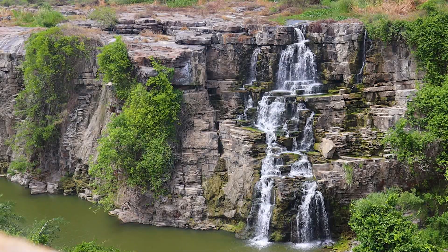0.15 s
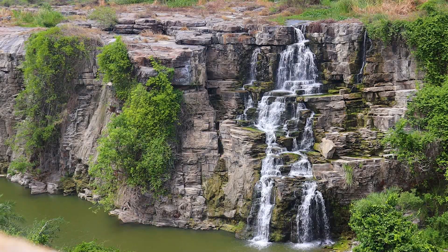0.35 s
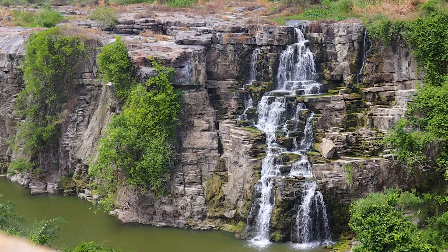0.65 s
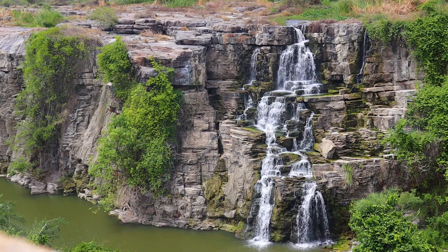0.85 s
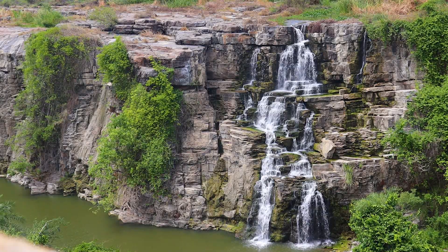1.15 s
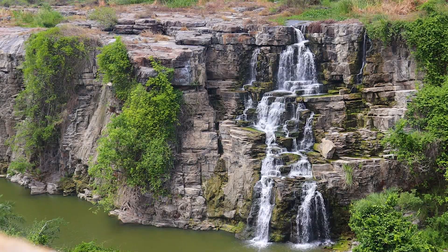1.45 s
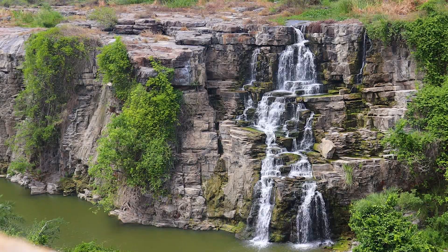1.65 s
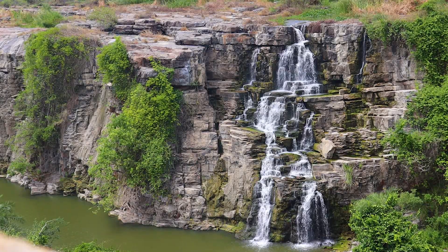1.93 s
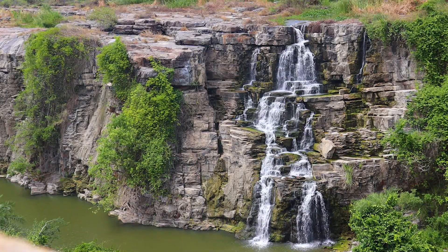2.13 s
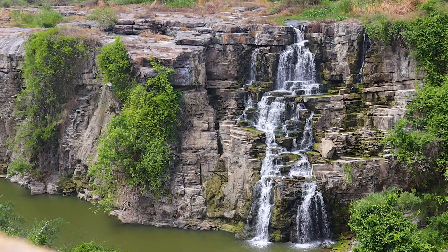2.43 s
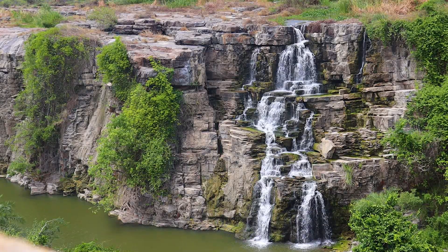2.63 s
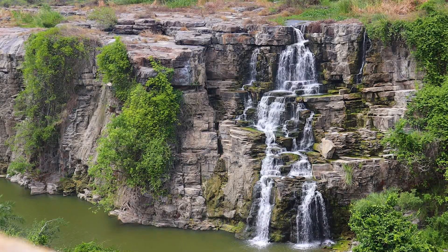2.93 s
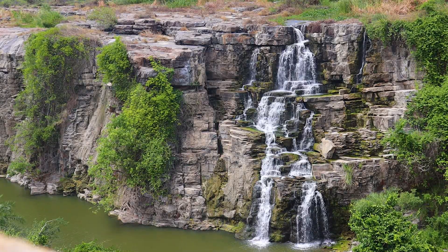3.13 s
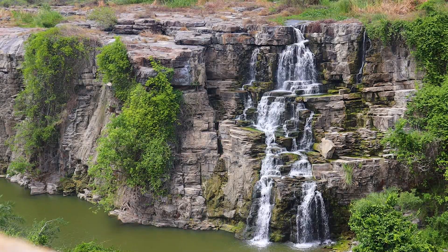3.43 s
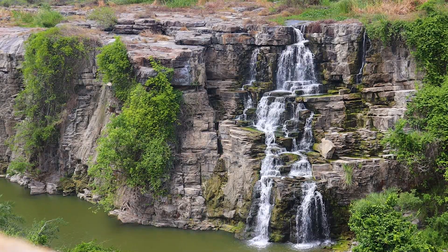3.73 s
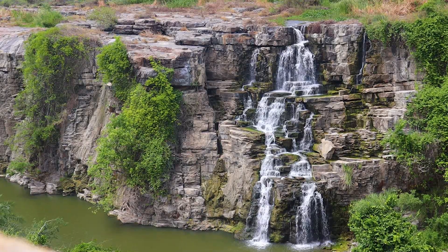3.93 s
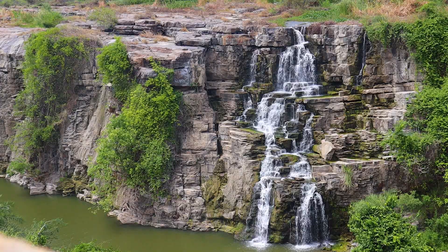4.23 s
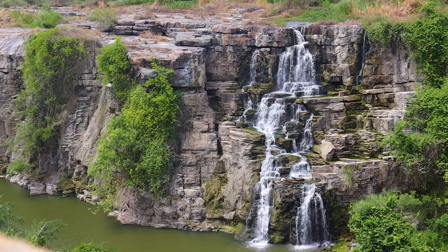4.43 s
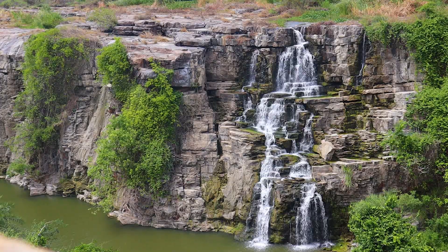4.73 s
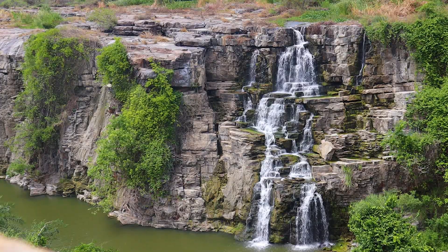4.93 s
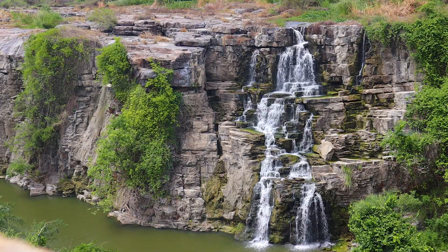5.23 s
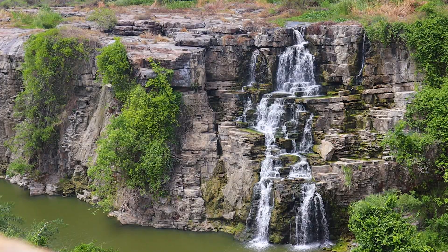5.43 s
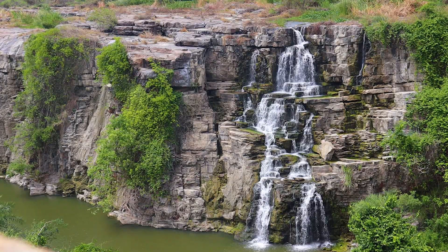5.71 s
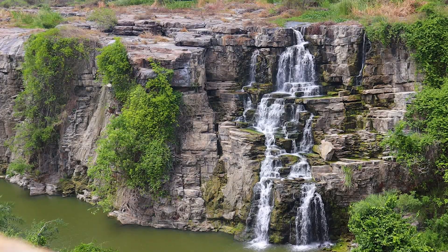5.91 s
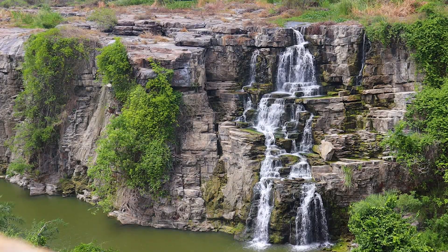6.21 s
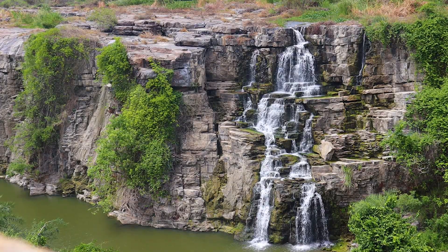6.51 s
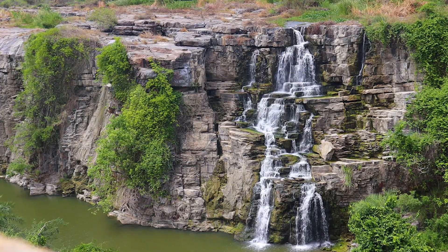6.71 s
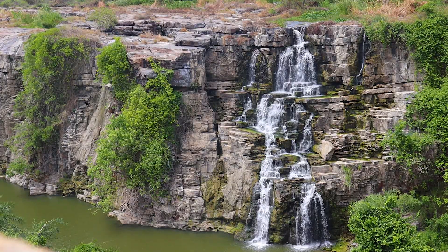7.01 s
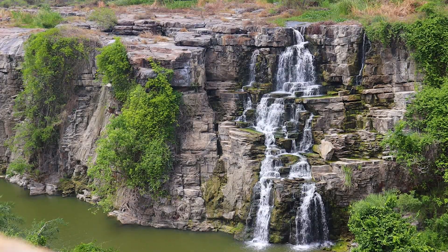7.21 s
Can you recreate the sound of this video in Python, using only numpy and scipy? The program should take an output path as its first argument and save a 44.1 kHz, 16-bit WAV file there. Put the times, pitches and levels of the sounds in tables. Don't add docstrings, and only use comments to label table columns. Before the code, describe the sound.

Steady falling water, low and hissy, dwindles to almost nothing over four seconds, leaving a faint woodland hush. One bird nearby sings a brisk song near the centre, another replies just left with repeated falling chirps. Small far calls and brief leaf rustles follow, then late quiet rising notes on the left as the water begins to swell. Open air, stereo, birds well above the water.

```python
import sys
import numpy as np
from scipy import signal
from scipy.io import wavfile
from scipy.ndimage import uniform_filter1d

SR = 44100
rng = np.random.default_rng(int(sys.argv[2]) if len(sys.argv) > 2 else 0)


def invert_db(level):
    return 10 ** (np.asarray(level, dtype=float) / 20)


def file_out(sig):
    cols = np.atleast_2d(sig).T
    lim = np.clip(cols, -1, 1)
    pcm = np.round(lim * 32767).astype(np.int16)
    wavfile.write(sys.argv[1], SR, pcm)


N = 324576


def evened(x):
    return x / np.sqrt(np.mean(x ** 2) + 1e-20)


def band_evened(x, lo_hz, hi_hz):
    hz, power = signal.welch(x.mean(0), SR, nperseg=4096)
    band = (hz > lo_hz) & (hz < hi_hz)
    return x / np.sqrt(power[band].sum() * hz[1])


def read(points, hz):
    f, value = np.transpose(points)
    return np.interp(np.log(hz + 1), np.log(f + 1), value)


def add(mix, s, sound):
    part = mix[..., round(s * SR):][..., :sound.shape[-1]]
    part += sound[..., :part.shape[-1]]


def hiss(colour, side_db, patchy_db, flicker_db):
    frames, hz = N // 256 + 5, np.fft.rfftfreq(1024, 1 / SR)
    a, b, c, d, patches = rng.standard_normal((frames, 513, 5)).T
    patches = uniform_filter1d(patches, size=12, axis=0)
    patches = evened(uniform_filter1d(patches, size=10, axis=1))
    gushes = evened(uniform_filter1d(rng.standard_normal(frames), size=6))
    mid = a + 1j * b
    side = (c + 1j * d) * invert_db(np.minimum(read(side_db, hz), 0))[:, None]
    z = np.array([mid + side, mid - side])
    z *= invert_db(read(colour, hz)[:, None] + patchy_db * patches + flicker_db * gushes)
    return signal.istft(z, nperseg=1024, noverlap=768)[1][:, :N]


# (f/Hz, level/dB per Hz)
RUSH = [(15, -52), (25, -23.5), (102, -4.5), (279, -3), (469, -4), (543, -2), (1220, -5), (1690, -9.5),
        (3280, -14.5), (3620, -17.5), (3990, -18.5), (4300, -20), (9000, -32.5), (11700, -61),
        (19800, -120)]
# (f/Hz, side minus mid level/dB)
RUSH_SIDE = [(60, -30), (110, -46), (200, -65), (380, -17), (700, -18.5), (1290, -12), (2380, -5),
             (4400, 1), (8120, 8), (15000, 0)]
# (f/Hz, level/dB per Hz)
SPRAY = [(5000, -18), (7000, -0.5), (9500, -1.5), (12000, 1.5), (14000, -1), (16000, -7)]


def water():
    fade_out_s, fade_in_s, span_s = 4.32, 5.6, 4.3
    rush_db, spray_db, air_db = -48.5, -58, -76.5
    t = np.arange(N) / SR
    water_fade = np.maximum(np.maximum(fade_out_s - t, t - fade_in_s), 0) / span_s
    rush = band_evened(hiss(RUSH, RUSH_SIDE, patchy_db=1.15, flicker_db=0.47), 50, 150)
    spray = band_evened(hiss(SPRAY, [(1, 0)], patchy_db=0.6, flicker_db=1.65), 9520, 11630)
    bend = np.where(t < fade_in_s, 1.04, 0.96)
    mist = np.hypot(invert_db(spray_db) * np.tanh((1.92 * water_fade) ** 1.38), invert_db(air_db))
    return rush * invert_db(rush_db) * water_fade ** bend + spray * mist


# (f/Hz, level/dB per Hz)
WOOD = [(100, -51), (150, -30), (200, -19), (310, -1.5), (530, 0.5), (1600, -9), (2200, -5), (3200, -4),
        (5200, -11), (9000, -24.5), (16000, -52)]
# (t/s, level/dB)
WOOD_LEVEL = [
    (0, -65),
    (1.0, -58),
    (2.6, -51.5),
    (3.8, -51.5),
    (4.2, -54.5),
    (5.6, -53),
    (6.3, -59),
    (7.36, -55),
]


def woodland():
    wood = evened(hiss(WOOD, [(1, -3)], patchy_db=1.3, flicker_db=.3))
    return wood * invert_db(np.interp(np.arange(N) / SR, *np.transpose(WOOD_LEVEL)))


def whistle(hz, level_db, fade, overtone_db):
    turn = 2 * np.pi * np.cumsum(hz) / SR
    beak_db = overtone_db - 12 * ((3 * hz - 12900) / 1500) ** 2
    tone = np.sin(turn) + invert_db(beak_db) * np.sin(3 * turn)
    return np.sqrt(2) * invert_db(level_db) * tone * signal.windows.tukey(len(hz), fade)


def warble(t, hz, db, depth, fade, overtone_db):
    warble_hz = 193.7
    wander = evened(uniform_filter1d(rng.standard_normal(len(t)), size=400))
    shake = 2 * np.pi * warble_hz * t + 0.71 * wander
    return whistle(hz + depth * np.sin(shake), db, fade, overtone_db)


# (f/Hz, t/s)
TREES = [(1000, 0.11), (2500, 0.95), (4500, 0.53), (7000, 0.9), (12000, 0.052)]


def trees(x, wet_db, near_db, near_s, same):
    taps = np.zeros((2, SR))
    at = np.arange(0, SR - 20, 20) + rng.integers(0, 20, (2, SR // 20 - 1))
    np.put_along_axis(taps, at, rng.choice([-1., 1.], at.shape), axis=1)
    taps[1] = same * taps[0] + np.sqrt(1 - same ** 2) * taps[1]
    lag = np.arange(SR) / SR
    near = 1 + invert_db(near_db) * np.exp(-lag / near_s)
    taps *= np.minimum(lag / 0.0018, 1) * near
    hz, t, z = signal.stft(taps, SR, nperseg=256)
    tail = signal.istft(z * invert_db(-60 * t / read(TREES, hz)[:, None]), SR, nperseg=256)[1]
    echo = signal.fftconvolve(x, tail / np.linalg.norm(tail[0]), axes=1)[:, :N]
    return x + invert_db(wet_db) * echo


# (t/s, length t/s, start f/Hz, end f/Hz, level/dB)
PIPER = [
    (0.024, 0.074, 3934, 3872, -33),
    (0.515, 0.087, 3972, 3903, -34.5),
    (1.042, 0.11, 3889, 3840, -36.5),
]
SEEPS = [
    (1.28, 0.041, 9650, 8860, -46.5),
    (1.612, .03, 9450, 9100, -52),
    (2.022, .028, 9500, 8330, -44.5),
    (4.714, 0.088, 8000, 7260, -58),
    (4.74, 0.068, 7260, 7320, -54),
    (4.881, 0.036, 7030, 6750, -62),
    (4.924, 0.047, 6740, 6660, -55),
]
CHIPS = [(3.517, 0.017, 4270, 3960, -53), (5.030, 0.012, 4420, 4020, -45),
         (5.047, 0.029, 4480, 4280, -46.5), (5.081, 0.014, 4320, 3900, -44),
         (5.295, 0.033, 5480, 5480, -63.5), (5.366, 0.012, 5170, 4460, -51),
         (5.406, 0.013, 4750, 3450, -43.5), (5.445, 0.0058, 4700, 4200, -50),
         (5.49, 0.0078, 4300, 3400, -38), (5.531, 0.012, 3330, 3100, -48), (5.559, 0.0123, 3430, 4330, -43),
         (5.603, 0.0105, 4570, 3640, -39.5), (5.650, 0.014, 5600, 4000, -57),
         (5.698, 0.0072, 3900, 4500, -43), (5.745, 0.0069, 4200, 3730, -44)]
COOS = [
    (5.182, 0.049, 2320, 2240, -59.5),
    (5.339, 0.025, 2310, 2275, -61),
    (5.434, 0.04, 1794, 1800, -55),
    (5.530, 0.157, 1850, 1790, -69),
    (5.739, 0.032, 2580, 2490, -57),
    (6.23, 0.11, 2390, 2297, -61),
]
BLIPS = [
    (2.152, 0.018, 1426, 1220, -35.5),
    (2.520, 0.019, 960, 894, -37.5),
    (5.296, 0.13, 1093, 1058, -65),
]
PIPS = [
    (6.285, .02, 4630, 4610, -71),
    (6.417, 0.018, 4550, 4640, -62),
    (6.553, 0.027, 4380, 4680, -60),
]
# (table of notes, left minus right level/dB)
PERCHES = [
    (PIPER, -4.5),
    (SEEPS, -7.5),
    (CHIPS, -5.5),
    (COOS, -7),
    (BLIPS, 2.5),
    (PIPS, 16),
]
# (t/s, length t/s, start f/Hz, end f/Hz, level/dB)
RASPS = [(0.093, 0.088, 3380, 2620, -46), (0.226, .035, 5210, 4580, -40.5), (0.257, 0.052, 4634, 4430, -37),
         (0.391, 0.077, 3100, 3410, -45.5), (0.745, 0.12, 4646, 4280, -40.5),
         (4.378, .04, 4900, 4780, -42.5), (4.514, 0.053, 7160, 7460, -63.5),
         (4.551, 0.077, 6300, 6330, -52.5), (5.097, 0.083, 3464, 3176, -44),
         (5.191, 0.083, 3120, 2695, -55), (5.453, .05, 3026, 3795, -44.5), (5.503, 0.059, 3480, 2966, -53),
         (5.756, 0.037, 2975, 3260, -48.5), (5.804, .06, 3000, 3380, -50.5),
         (5.867, 0.057, 2900, 2580, -59)]


def far_birds():
    overtone_db = -58
    out = np.zeros((2, N))
    for bird, pan_db in PERCHES:
        for s, length, start_hz, end_hz, db in bird:
            u = np.linspace(0, 1, round(length * SR))
            hz = start_hz + (end_hz - start_hz) * u ** 0.673
            add(out, s, whistle(hz, db, 0.47, overtone_db) * invert_db([[pan_db / 2], [-pan_db / 2]]))
    for s, length, start_hz, end_hz, db in RASPS:
        t = np.arange(round(length * SR)) / SR
        hz = start_hz + (end_hz - start_hz) * t / length
        rasp = warble(t, hz, db, 210, 0.5, overtone_db)
        add(out, s, rasp * invert_db([[-1.6], [1.6]]))
    return trees(out, 0.44, 2.5, 0.0077, 0.38)


def song(parts, strokes, overtone_db):
    out = np.zeros(N)
    for shape, repeats in parts:
        for start, level_db, pitch in repeats:
            for at, length, start_hz, end_hz, peak_db in shape:
                u = np.linspace(0, 1, round(length * SR))
                from_db, peak, to_db, bend = strokes[int(end_hz > start_hz)]
                swell_db = np.interp(u, [0, peak, 1], [from_db, 0, to_db])
                hz = pitch * (start_hz + (end_hz - start_hz) * u ** bend)
                add(out, start + at, whistle(hz, level_db + peak_db + swell_db, 0.18, overtone_db))
    return out


def buzz(rows, overtone_db):
    s, hz, db = np.transpose(rows)
    t = np.arange(s[0], s[-1], 1 / SR)
    hz = np.interp(t, s, hz)
    out = np.zeros(N)
    add(out, s[0], warble(t, hz, np.interp(t, s, db), 0.1 * hz, 0.12, overtone_db))
    return out


# (t/s after its start, length t/s, start f/Hz, end f/Hz, peak level/dB)
SIP = [
    (0, 0.0073, 7160, 5880, 2),
    (.008, 0.0112, 5800, 3800, -11),
    (.018, 0.024, 5730, 5260, -7),
    (.035, 0.0068, 3690, 5900, -4),
    (.041, .005, 5710, 6900, 2.5),
    (.046, .011, 7000, 8020, -13),
]
SWOOP = [
    (0, 0.00544, 7430, 4170, -8),
    (.005, .005, 4320, 5170, -9),
    (.009, 0.0187, 5260, 4910, -3.5),
    (.044, 0.027, 5600, 3078, -0.5),
    (.075, .019, 3525, 4660, 2.5),
    (.093, 0.0094, 4520, 6100, -3.5),
]
CHOP = [
    (0, 0.016, 3390, 3445, -4.5),
    (.014, 0.00595, 3750, 5340, -10),
    (.020, 0.0137, 5380, 3600, 1.5),
    (.037, 0.0074, 3440, 2950, 2),
    (.046, .017, 2900, 2050, -12),
]
TURN = [
    (0, .007, 8030, 4000, -13),
    (.034, 0.0105, 2040, 2820, -20),
    (.044, 0.0186, 2796, 3680, -0.5),
    (.065, .017, 3550, 4480, -1),
    (.083, 0.018, 3530, 1950, -9),
]
# (syllable, its repeats as (t/s, level/dB, pitch factor))
FIRST = [
    (SIP, [(1.101, -53, 1), (1.207, -35.5, 1), (1.313, -30.5, 1), (1.419, -27, 1), (1.524, -24.5, .99)]),
    (SWOOP, [(1.631, -18, 1.018), (1.797, -15.5, 0.98), (1.968, -15, 0.98), (2.138, -15, .97)]),
    (CHOP, [(2.298, -19, 1.01), (2.390, -19, 1.0), (2.481, -18, 1.0), (2.573, -18.5, .99), (2.666, -19.5, .99)]),
    (TURN, [(2.799, -14.5, 0.99)]),
]
# (start level/dB, peak place 0-1, end level/dB, bend: under 1 fast at first)
FIRST_STROKES = [
    (-7, .3, -9, .62),
    (-8, .62, -7, .8),
]
# (t/s, f/Hz, level/dB)
FIRST_BUZZ = [
    (2.964, 4950, -36),
    (2.990, 4860, -21.5),
    (3.045, 4960, -24),
    (3.062, 4270, -20.5),
    (3.082, 3303, -23),
    (3.105, 2640, -31.5),
    (3.150, 2184, -38),
    (3.185, 2090, -38),
]


def first_finch():
    overtone_db = -34.5
    voice = song(FIRST, FIRST_STROKES, overtone_db) + buzz(FIRST_BUZZ, overtone_db)
    return trees(voice * invert_db([[.3], [-.3]]), -1.8, 5.8, 0.013, 0.65)


# (t/s after its start, length t/s, start f/Hz, end f/Hz, peak level/dB)
TSEE = [
    (0, .008, 4300, 5250, -9),
    (.005, .034, 5330, 5050, 1),
    (.030, .010, 8000, 5600, -13),
    (.036, .022, 7200, 6900, -14),
    (.042, .028, 6100, 5800, -4),
]
LEAD = [
    (0, 0.016, 3840, 4020, -4.5),
    (.023, 0.0067, 4060, 4300, 0),
    (.031, .018, 4250, 3000, 3),
]
CHEW = [
    (0, .008, 5000, 6670, -22),
    (.009, .049, 4750, 1745, 0),
]
# (syllable, its repeats as (t/s, level/dB, pitch factor))
SECOND = [
    (TSEE, [(3.245, -44, 1.03), (3.342, -41, 1.02), (3.441, -38, 1), (3.537, -38, .98), (3.633, -36, .97), (3.730, -38, .965)]),
    (LEAD, [(3.830, -29, 1)]),
    (CHEW, [(4.089, -25, 1), (4.181, -24, 1), (4.276, -24, 1), (4.369, -24, 1), (4.464, -24, 1), (4.564, -25, 1), (4.664, -25, 1), (4.763, -27, 1)]),
]
# (start level/dB, peak place 0-1, end level/dB, bend)
SECOND_STROKES = [
    (-11, 0.37, -20.5, 0.81),
    (-3, 0.53, -6, .9),
]
# (t/s, f/Hz, level/dB)
SECOND_BUZZ = [
    (3.879, 2750, -43),
    (3.900, 3106, -35.5),
    (3.945, 4025, -35),
    (3.995, 4490, -37.5),
    (4.030, 4480, -32),
]


def second_finch():
    overtone_db = -58
    voice = song(SECOND, SECOND_STROKES, overtone_db) + buzz(SECOND_BUZZ, overtone_db)
    return trees(voice * invert_db([[1.8], [-1.8]]), 1.0, 2.5, 0.013, 0.47)


# (t/s, length t/s, level/dB)
RUSTLES = [
    (3.538, 0.055, -55),
    (4.37, 0.11, -60),
    (5.02, 0.033, -62),
    (5.268, 0.09, -56),
    (5.375, 0.14, -54),
]
# (f/Hz, level/dB per Hz)
LEAVES = [(2000, -27), (5000, -3), (8000, 0), (12000, -4), (15000, -12)]


def rustles():
    shape = np.zeros(N)
    for s, length, db in RUSTLES:
        add(shape, s, invert_db(db) * np.hanning(round(length * SR)))
    return shape * evened(hiss(LEAVES, [(1, 0)], patchy_db=-5.5, flicker_db=-1.0))


# (t/s after its start, length t/s, start f/Hz, end f/Hz, peak level/dB)
RISE = [
    (0, 0.017, 5030, 3520, -1),
    (.030, 0.0332, 2870, 3500, 1),
    (.061, .013, 3450, 4300, -1.5),
]
# (syllable, its repeats as (t/s, level/dB, pitch factor))
THIRD = [
    (RISE, [(6.670, -50, 1), (6.836, -48, 1), (7.001, -47, 1), (7.166, -46, 1), (7.332, -44, 1)]),
    (TSEE, [(7.150, -47, 1.05), (7.248, -43, 1.04), (7.348, -39, 1.01)]),
]
# (start level/dB, peak place 0-1, end level/dB, bend)
THIRD_STROKES = [
    (-11, 1, -10, .8),
    (1, 0.44, -4, 0.76),
]


def third_finch():
    voice = song(THIRD, THIRD_STROKES, -58)
    return trees(voice * invert_db([[1.6], [-1.6]]), 1.0, 2.5, 0.013, 0.47)


def scene():
    birds = far_birds() + first_finch() + second_finch() + third_finch()
    return water() + woodland() + birds + rustles()


def band_limit(x):
    return signal.sosfilt(signal.butter(12, 16490, fs=SR, output="sos"), x)


def record(dry):
    lowpass = signal.firwin(1023, 15850, window=("kaiser", 9), fs=SR)
    limited = signal.oaconvolve(dry, lowpass[None], "same")
    return band_limit(limited)


dry = scene()
out = record(dry)
file_out(out)
```